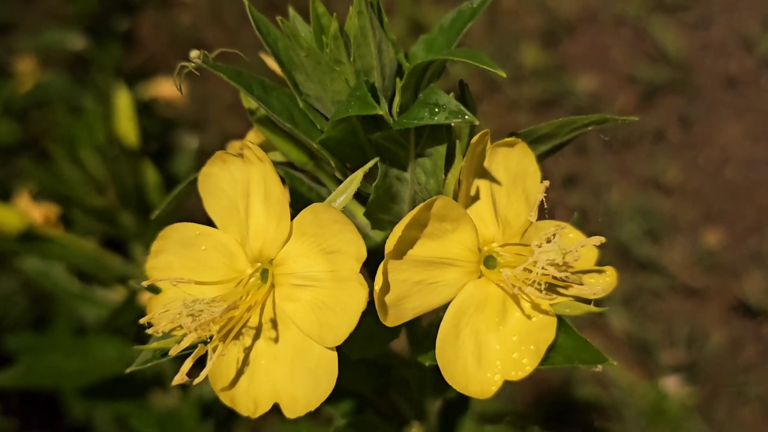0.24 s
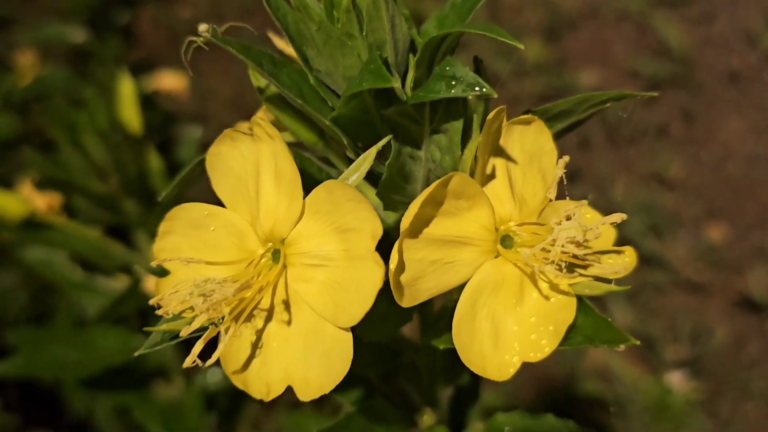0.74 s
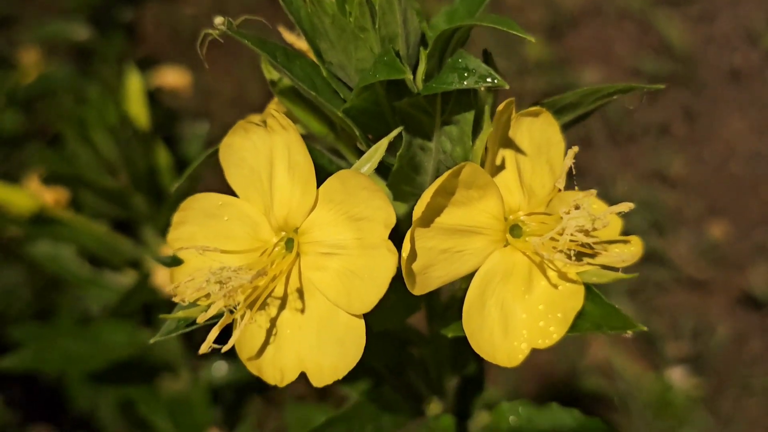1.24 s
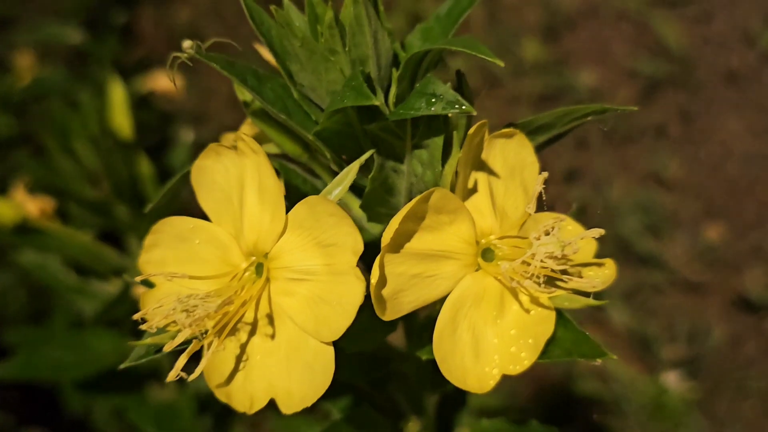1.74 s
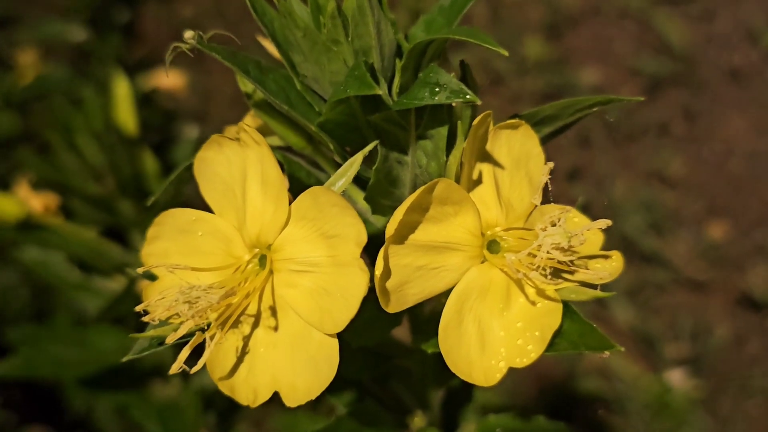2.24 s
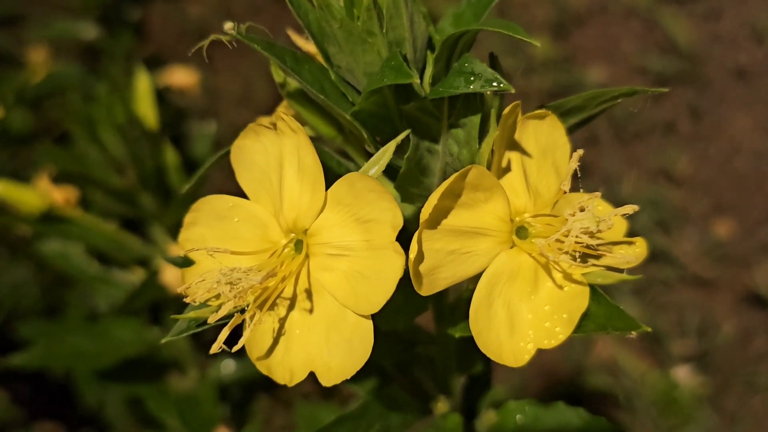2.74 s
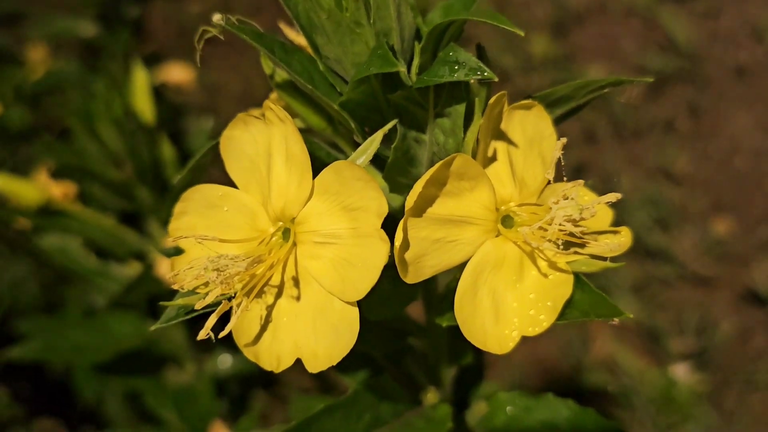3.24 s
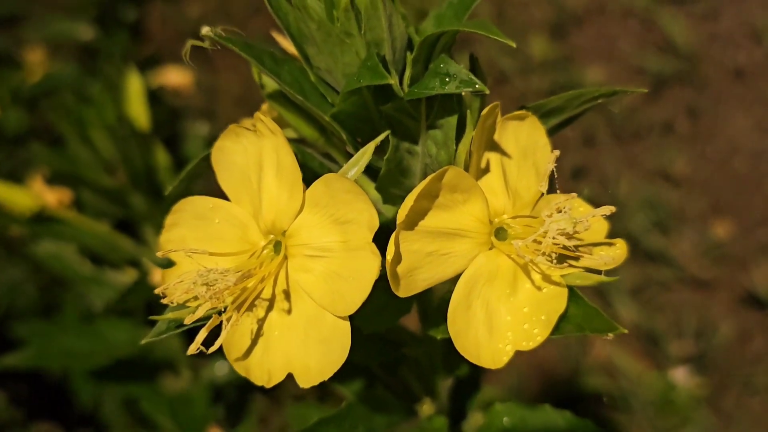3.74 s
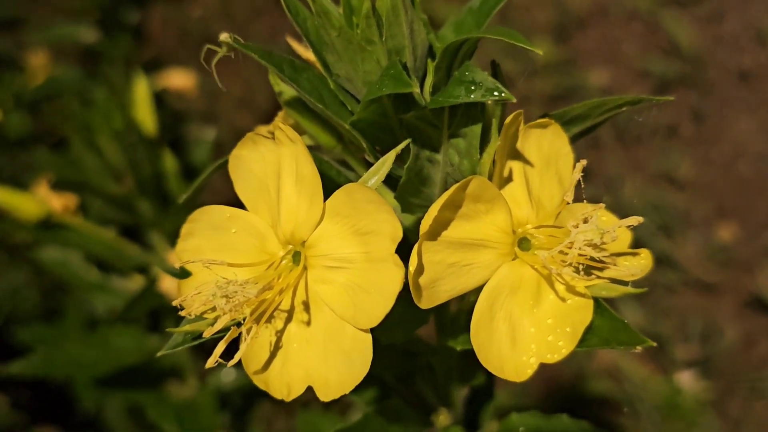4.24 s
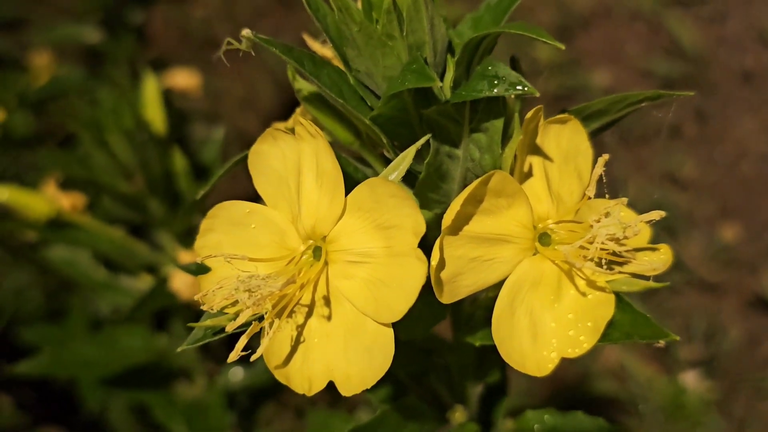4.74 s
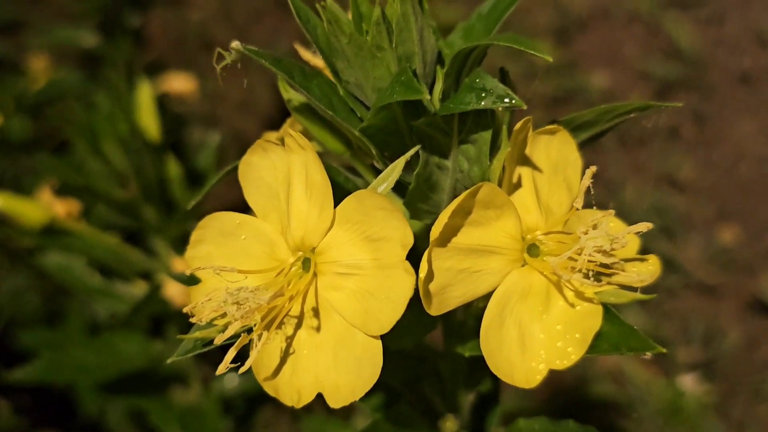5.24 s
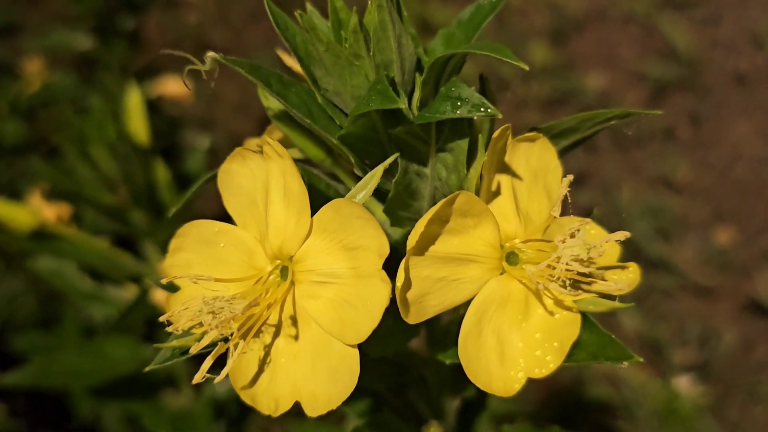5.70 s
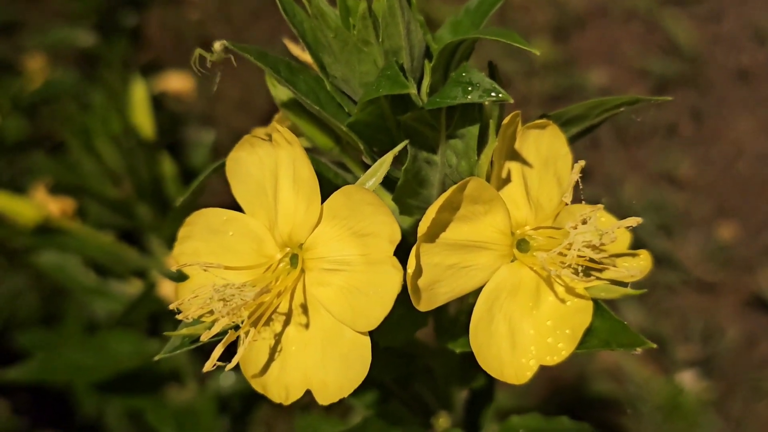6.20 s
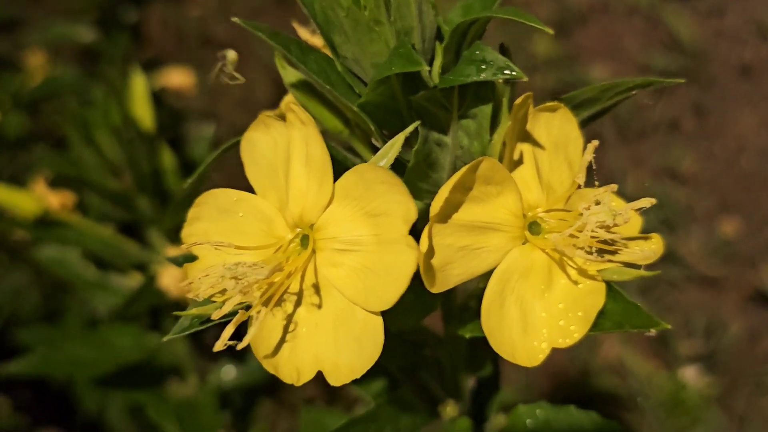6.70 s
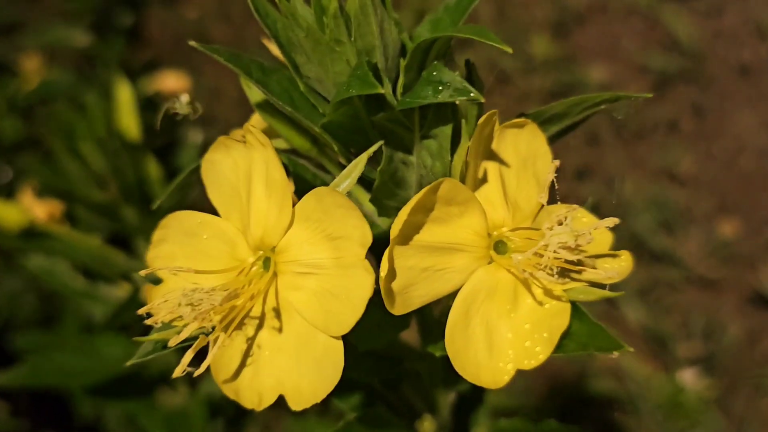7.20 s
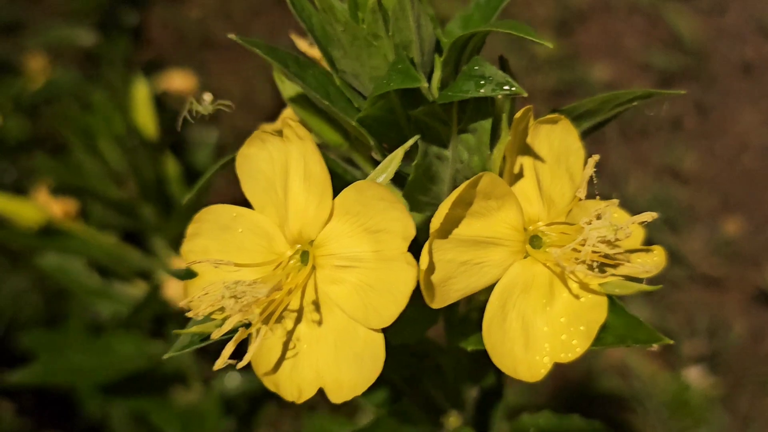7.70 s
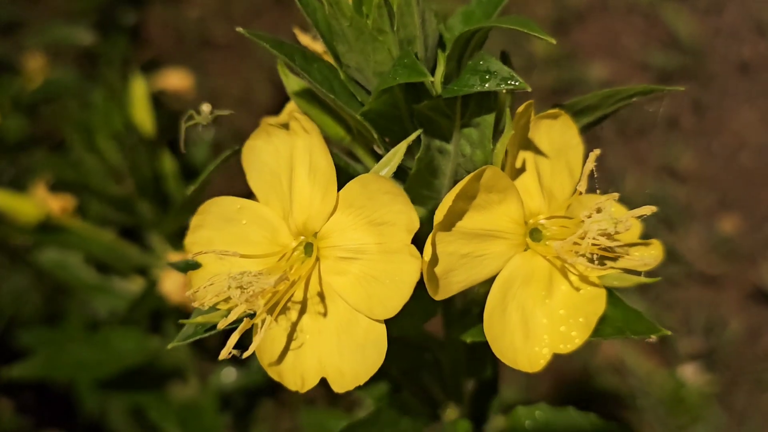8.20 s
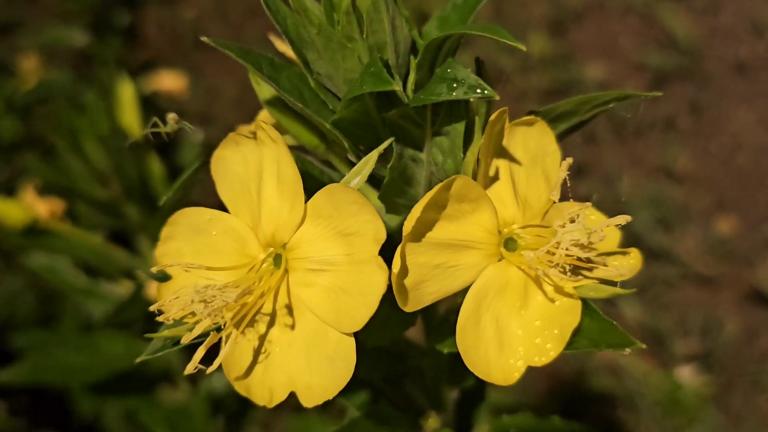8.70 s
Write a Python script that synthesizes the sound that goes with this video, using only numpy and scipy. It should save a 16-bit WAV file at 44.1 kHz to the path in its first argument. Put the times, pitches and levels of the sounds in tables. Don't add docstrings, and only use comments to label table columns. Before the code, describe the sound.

About nine seconds of an open meadow in wide stereo. Deep far road rumble is constant, with soft wind thumps at 0.3 and 1.4 s and stronger ones near 7 and 7.5 s. Tree crickets, around 3 kHz, trill in fluttering phrases of about half a second, swelling with short dips between and quieter after 7 s. A dry stem ticks at 0.2 s. A short bright zip repeats every 0.75 s, left of centre; a faint fast buzz swells and cuts off about every 1.25 s. A near katydid rasps very high on the left until 4 s, then from 5 s, growing strongest around 8.5 s; a farther one scrapes fainter at 0.8-2.6 and 4.3-6.2 s. A single chirp pulse falls at 2.6 s. A faint ground cricket rattles at 5.6-6 s, a closer left one at 7.1-7.9 s. A faint low motor drone enters near 7.9 s and recedes.

```python
import sys
import numpy as np
from scipy import signal
from scipy.fft import rfft, irfft, next_fast_len
from scipy.io import wavfile
from scipy.ndimage import uniform_filter1d, map_coordinates

SR = 44100
rng = np.random.default_rng(int(sys.argv[2]) if len(sys.argv) > 2 else 0)


def how_loud(loudness_db):
    steps = np.asarray(loudness_db, float) / 20
    return 10 ** steps


def to_wav(sig):
    pcm = np.clip(np.atleast_2d(sig), -1, 1) * 32767
    pcm = np.round(pcm).astype(np.int16)
    wavfile.write(sys.argv[1], SR, pcm.T)


N = 394694

# f/Hz, spectral density level/dB
FILE_SPECTRUM = [(5000, -42), (8000, -32), (10500, -22), (11500, -12), (13500, -5), (15000, -2), (16000, 0)]


def in_time(rows):
    s, *columns = np.transpose(rows)
    return [np.interp(np.arange(N) / SR, s, c) for c in columns]


def at_hz(points, hz):
    table_hz, table_db = np.array(points)[:, 0], np.array(points)[:, 1]
    return np.interp(np.log(hz + 1), np.log(table_hz), table_db)


def rms_one(x):
    return x / np.sqrt(np.mean(x ** 2) + 1e-20)


def drift(rate):
    knots = rng.standard_normal(400)
    return map_coordinates(knots, [np.arange(N) * min(rate, 40) / SR], order=3)


def coloured(x, spectrum, lag_ms=0):
    size = next_fast_len(N)
    hz = np.arange(size // 2 + 1) * SR / size
    delay = np.exp(-2j * np.pi * hz * lag_ms / 1000)
    return irfft(rfft(x, size) * how_loud(at_hz(spectrum, hz)) * delay, size)[..., :N]


def ringing(x, hz, width_hz):
    band = [hz - width_hz / 2, hz + width_hz / 2]
    return signal.sosfilt(signal.butter(3, band, "band", fs=SR, output="sos"), x + 1e-18)


def panned(x, pan_db, lead=0):
    right = how_loud(-np.asarray(pan_db)) + 0 * x
    return np.array([x, np.roll(x, lead) * right]) * 2 / (1 + right)


def foliage(x, wet_db, t60):
    t = np.arange(4000) / SR
    scatter = rng.standard_normal((2, 4000)) * how_loud(-60 * t / t60) * (t > .002)
    scatter = scatter / np.sqrt(np.sum(scatter ** 2, axis=1, keepdims=True))
    echoes = signal.fftconvolve(x, scatter, axes=1)[:, :N]
    return (x + how_loud(wet_db) * echoes) / np.sqrt(1 + how_loud(2 * wet_db))


def beats(phrases, uneven_ms, uneven_db):
    rows = []
    for s, so_far, db in map(np.transpose, phrases):
        whole = np.arange(round(so_far[-1]) + 1)
        rows += zip(np.interp(whole, so_far, s), np.interp(whole, so_far, db))
    return rows + rng.standard_normal((len(rows), 2)) * [uneven_ms / 1000, uneven_db]


def wing_pulses(hz, per_s, duty, fall, overtones, lag_ms=0):
    beat = np.cumsum(per_s * (1 + .008 * drift(2.5))) / SR + rng.random()
    strength = how_loud(1.5 * rng.standard_normal(3000))
    slip = np.cumsum(.6 * rng.standard_normal(3000))
    wing_hz = hz * (1 + .0015 * drift(1.5))
    ports = []
    for late_s in (lag_ms / 1000, 0):
        count, part = np.divmod(beat + 1 - late_s * per_s, 1)
        count = count.astype(int)
        closing = np.clip(part / duty, 0, 1)
        sag = 1 + fall * (.5 - closing / 2)
        phase = 2 * np.pi * wing_hz * part / per_s * sag + slip[count]
        tone = np.sin(phase) + sum(how_loud(db) * np.sin(k * phase) for k, db in overtones)
        ports.append(tone * np.sin(np.pi * closing) ** .8 * strength[count])
    return np.array(ports)


def background():
    # f/Hz, spectral density level/dB
    road_spectrum = [(12, -63), (20, -13.5), (41, -3), (64, 1.5), (97, -9.5), (235, -12.5), (266, -16.5),
                     (307, -21), (333, -23.5), (361, -28.5), (711, -33.5), (855, -30.5), (1140, -26.5),
                     (2490, -45), (2700, -51.5), (3510, -48.5), (5940, -120)]
    # f/Hz, spectral density level/dB
    air_spectrum = [(2600, -31), (3400, -3.5), (4700, -4), (5500, -9), (7000, -9.5), (10500, -19.5),
                    (12000, -3), (16000, -4)]
    # f/Hz, likeness/1
    coherence = [(40, .94), (300, .92), (420, .82), (600, .45), (1400, .65), (2000, .25), (4000, .1)]
    shared, left, right = rng.standard_normal((3, N))
    bounded = [(hz, np.clip(c, .01, .99)) for hz, c in coherence]
    alike = [(hz, 10 * np.log10(c)) for hz, c in bounded]
    unlike = [(hz, 10 * np.log10(1 - c)) for hz, c in bounded]
    common = np.array([coloured(shared, alike), coloured(shared, alike, lag_ms=0.41)])
    pair = common + coloured(np.array([left, right]), unlike)
    road = rms_one(coloured(pair, road_spectrum)) * how_loud(-43.5) * panned(how_loud(.4 * drift(1.2)), 1.5)
    air = rms_one(coloured(pair, air_spectrum)) * how_loud(-81.5 + 4.0) * panned(np.ones(N), 6.4)
    return road + air


def wind_and_motor():
    # t/s, level/dB
    gust_curve = [(0.0, -44.5), (0.25, -37.5), (0.45, -47), (1.35, -50), (1.42, -39), (2.22, -51.5),
                  (5.56, -46.5), (6.86, -41.5), (6.98, -32), (7.15, -46.5), (7.53, -33), (7.68, -41),
                  (8.95, -47)]
    # t/s, level/dB
    motor_curve = [
        (7.75, -87),
        (7.9, -51),
        (8.95, -56),
    ]
    rumble_db = -46.5
    gust = np.sqrt(np.maximum(how_loud(2 * in_time(gust_curve)[0]) - how_loud(2 * rumble_db), 0))
    turbulence = [(15, 2), (35, 0.5), (70, 3.5), (130, -7.0), (300, -32.5), (600, -71)]   # f/Hz, level/dB
    lumps = rms_one(coloured(rng.standard_normal((2, N)), turbulence))
    lumps = lumps + 1.2 * lumps[0]
    motor_hz = 165 * (1 + 0.01196 * drift(4.7))
    motor_level = how_loud(in_time(motor_curve)[0] + 3.0 + 1.0 * drift(5.1))
    motor = np.sin(2 * np.pi * np.cumsum(motor_hz) / SR) * motor_level
    return rms_one(lumps) * panned(gust, 1.3) + motor


def phrasing():
    # start t/s, end t/s, level/dB
    phrase_table = [(-.2, 0.327, -56), (0.53, 0.957, -54), (0.99, 1.34, -59), (1.296, 1.668, -55.5),
                    (1.842, 2.266, -54.5), (2.384, 2.94, -57.5), (3.046, 3.563, -56.5), (3.59, 3.9, -57),
                    (3.91, 4.51, -58), (4.55, 5.088, -57.5), (5.252, 5.69, -55.5), (5.935, 6.32, -54),
                    (6.508, 6.964, -55), (7.12, 7.453, -60.5), (7.652, 8.01, -60.5), (8.223, 8.59, -60),
                    (8.763, 9.1, -61.5)]
    between_db, swell_db_per_s = -60.5, -4
    attack_s, release_s = .11, .05
    t = np.arange(N) / SR
    power = how_loud(2 * between_db)
    for start, end, db in phrase_table:
        rise, fall = (t - start) / attack_s, (end - t) / release_s + .5
        shape = np.clip(np.minimum(rise, fall), 0, 1)
        power = power + (shape * how_loud(db - swell_db_per_s * (end - t))) ** 2
    return 10 * np.log10(power)


def tree_crickets():
    # wing f/Hz, pulse rate/Hz, level/dB, lag of the left port/ms
    singer_table = [(2990, 57.0, 0, .035), (2985, 55.6, -6, -.02), (3050, 53.5, -8, .04),
                    (2950, 58.1, -8, -.05), (3000, 51.0, -9, .05), (3110, 56.1, -13, -.02),
                    (2910, 54.4, -13, .03)]
    # multiple of f/1, level/dB
    wing_overtones = [(2, -30), (3, -35.5)]
    level_db = phrasing()
    voices = []
    for hz, per_s, db, lag_ms in singer_table:
        song = wing_pulses(hz, per_s, .66, .05, wing_overtones, lag_ms)
        voices.append(foliage(how_loud(db + 2.5 * drift(1.6)) * song, -10, .1))
    choir = voices[0] * how_loud(.7 * (level_db + 55)) + sum(voices[1:])
    choir = choir / np.sqrt(uniform_filter1d(np.mean(choir, axis=0) ** 2, size=6000))
    return choir * panned(how_loud(level_db), 2.4)


def buzzer():
    # t/s, level/dB
    phrase_ends = [(.18, -76), (1.37, -76), (2.65, -74.5), (3.9, -77), (5.15, -74.5), (6.41, -75),
                   (7.66, -75), (8.92, -74.5)]
    t = np.arange(N) / SR
    left_s, swell = 0, 0
    for end, db in phrase_ends:
        left_s = left_s + (end - t) * (t < end) * (t > end - .75)
    for end, db in phrase_ends:
        swell = swell + how_loud(db - 1.5 - 18.0 * left_s) * (t < end) * (t > end - .75)
    song = rms_one(wing_pulses(6350 - 300 * left_s, 138., .4, .08, [], -.18))
    return foliage(song * panned(swell, 5.0), -2, .1)


def katydid(strokes, tooth_ms, width_ms, back_ms, back_db, fuzz):
    bumps = np.zeros(N + SR)
    s, db = np.transpose(strokes)
    bumps[(s * SR).astype(int)] = how_loud(db)
    bumps[((s + back_ms / 1000) * SR).astype(int)] = how_loud(db + back_db)
    t = np.arange(-900, 901) / SR
    stroke = np.convolve(bumps, np.exp(-.5 * (t * 1000 / width_ms) ** 2), "same")[:N]
    teeth_so_far = np.cumsum(1000 / tooth_ms * (1 + .12 * drift(30.))) / SR
    teeth = np.diff(np.floor(teeth_so_far), prepend=0)
    teeth = rms_one(teeth * how_loud(2.9 * rng.standard_normal(N)))
    rasp = rms_one(coloured(teeth + fuzz * rng.standard_normal(N), FILE_SPECTRUM))
    return rasp * stroke


def katydids():
    # t/s, strokes so far/1, level/dB
    near_strokes = [
        [(.026, 1, -58), (.203, 3, -72)],
        [(.050, -0.5, -55.5), (.664, 10, -65)],
        [(.713, 0, -66), (.831, 4, -59), (1.187, 8, -53.5), (1.998, 20.5, -53), (2.060, 22, -51.5)],
        [(2.095, -0.5, -53), (2.370, 5, -47), (2.779, 12, -53), (3.795, 29, -50), (4.035, 34.5, -60)],
        [(4.945, -0.5, -52.5), (5.140, 3, -52.5), (5.310, 6, -50), (5.498, 9.5, -57), (6.163, 19.5, -52),
         (6.230, 21, -58), (6.436, 23, -60)],
        [(6.540, 0, -52.5), (6.865, 6, -49), (7.388, 15, -47), (8.538, 34, -43.5)],
        [(8.614, 0, -53), (8.909, 5, -53)],
    ]
    # t/s, left-right level/dB
    near_pan = [(0.28, 19), (0.8, 10), (1.28, 11), (1.78, 10), (2.29, 13), (2.75, 7), (3.23, 19), (3.7, 11),
                (4.83, 7), (5.53, 12), (6.06, 15), (6.61, 20), (7.07, 12), (7.54, 6), (8.02, 5.5),
                (8.51, 11), (8.85, 24)]
    # t/s, strokes so far/1, level/dB
    far_strokes = [
        [(.757, -3, -84), (.866, 2, -58), (1.379, 12.5, -68), (1.731, 18, -56), (2.460, 29, -60),
         (2.645, 35, -64)],
        [(4.250, 0.5, -73), (4.415, 4, -53.5), (4.697, 9, -53), (4.997, 15, -57.5), (5.300, 19, -58),
         (6.165, 32.5, -53.5)],
        [(8.574, -8, -67), (8.938, 8, -68)],
    ]
    # t/s, level/dB, left-right level/dB
    hiss_curve = [(0, -75, 10), (.6, -91, 9), (.9, -76, -8), (2.4, -73, 17), (2.9, -80, 8), (4.0, -75, 5),
                  (4.1, -85, 4), (4.2, -91, -6), (4.4, -72, -1), (6.1, -64, -1), (6.25, -84, 8),
                  (6.45, -88, 8), (6.7, -71, 4), (7.5, -66, 6), (8.5, -62, 4), (8.95, -70, 5)]
    near = katydid(beats(near_strokes, 1.2, 1.3), tooth_ms=3.1, width_ms=4.5, back_ms=27., back_db=-10, fuzz=.9)
    near = panned(near, in_time(near_pan)[0], lead=20)
    far = katydid(beats(far_strokes, 2., 2.), tooth_ms=2.6, width_ms=4.5, back_ms=25., back_db=-8, fuzz=.6)
    far = panned(far, -2.5, lead=-13)
    hiss_db, pan_db = in_time(hiss_curve)
    hiss = rms_one(coloured(rng.standard_normal((2, N)), FILE_SPECTRUM))
    hiss = hiss * panned(how_loud(hiss_db + 2 * drift(30.)), pan_db)
    return foliage(near * how_loud(-1.5), -12, .03) + foliage(far, -5, .04) + hiss


def zipper():
    # t/s, peak level/dB
    zip_times = [(.078, -56.5), (0.8, -59), (1.506, -56.5), (2.276, -56.5), (3.027, -56.5), (3.787, -57.5),
                 (4.529, -55), (5.257, -56), (6.009, -56.5), (6.829, -56), (7.607, -58), (8.328, -58.5)]
    # f/Hz, width/Hz, level/dB, teeth to full strength/1
    wing_modes = [(8850, 700, 0, 2.5), (9750, 900, -2, 7.0), (11400, 1000, -2, 8.0)]
    out, teeth = np.zeros(N), np.arange(24)
    for s, db in zip_times:
        spacing = SR / (341 + 1.2 * rng.standard_normal())
        comb = np.sinc(np.arange(5000)[:, None] - 20 - teeth * spacing)
        run = np.zeros(5000)
        for k, (hz, width_hz, mode_db, wake) in enumerate(wing_modes):
            tooth_db = mode_db - 14 * np.exp(-teeth / wake) + rng.standard_normal(24)
            run += (-1) ** k * ringing(comb @ how_loud(tooth_db), hz, width_hz)
        at = round(s * SR)
        out[at:at + 5000] += how_loud(db + 31.5) * run
    return foliage(panned(out, 6.0, lead=13), -4, .06)


def stem():
    # t/s, peak level/dB
    tick_time = [
        (0.238, -51),
    ]
    s, db = tick_time[0]
    click = np.zeros(N)
    click[round(s * SR) + 20] = how_loud(db + 17.0)
    return panned(signal.sosfilt(signal.butter(2, [4800, 6800], "band", fs=SR, output="sos"), click), 10.0)


def rattle(pulses, hz, first_bend, ring_db, snap_db):
    # f/Hz, width/Hz, level/dB
    ring_modes = [(8560, 195, -2), (8100, 420, -10), (8870, 1040, -12)]
    # f/Hz, spectral density level/dB
    snap_spectrum = [(3300, -61), (4000, 2.5), (4900, -3), (5500, -7), (6200, -6.5), (7400, -5.5),
                     (9500, 2), (11000, -17)]
    wing, clicks, t = np.zeros(N), np.zeros(N), np.arange(900) / SR
    for k, (s, db) in enumerate(pulses):
        at = round((s - .001) * SR)
        wing_hz = hz * (1 + first_bend * np.exp(-k / 4.0) + .005 * rng.standard_normal())
        envelope = np.sin(np.pi * np.clip(t / 0.0041, 0, 1))
        wing[at:at + 900] += how_loud(db) * envelope * np.sin(2 * np.pi * wing_hz * t * (1 - 3.2 * t))
        clicks[at] = how_loud(db + 2 * rng.standard_normal())
    shake = signal.fftconvolve(clicks, t * 900 * np.exp(-t / 0.0036))[:N]
    ring = np.zeros(N)
    for mode_hz, width_hz, db in ring_modes:
        rough = shake * rng.standard_normal(N)
        ring += how_loud(db + ring_db) * ringing(rough, mode_hz * hz / 4420, width_hz)
    return wing + ring + how_loud(snap_db) * coloured(shake * rng.standard_normal(N), snap_spectrum)


def ground_crickets():
    # t/s, peak level/dB
    lone_pulse = [
        (2.6419, -48),
    ]
    # t/s, pulses so far/1, peak level/dB
    far_pulses = [
        (5.6037, -1, -72),
        (5.6917, 4, -61.5),
        (5.8463, 11, -57.5),
        (6.0294, 19.5, -59.5),
    ]
    # t/s, pulses so far/1, peak level/dB
    near_pulses = [
        (7.0750, 1, -68),
        (7.0983, 1, -53),
        (7.239, 7, -51),
        (7.5139, 19, -52.5),
        (7.7493, 29, -50.5),
        (7.8516, 34, -55.5),
        (7.8780, 35.5, -69),
    ]
    near = rattle(beats([near_pulses], .3, 1.8), 4520, -.06, ring_db=7, snap_db=-4)
    near = near + rattle(lone_pulse, 4500, -.025, ring_db=9, snap_db=-4)
    far = rattle(beats([far_pulses], .4, 1.6), 5300, -.005, ring_db=-8, snap_db=-15)
    far = panned(far, 3.9, lead=10)
    return foliage(panned(near, 12., lead=21), -14, .08) + foliage(far, -7, .08)


def scene():
    insects = tree_crickets() + buzzer() + katydids() + zipper() + ground_crickets()
    return background() + wind_and_motor() + insects + stem()


def low_pass(x):
    return signal.sosfilt(signal.butter(12, 16640, fs=SR, output="sos"), x)


def record(dry):
    cut = signal.sosfilt(signal.ellip(12, .5, 70, 15800, fs=SR, output="sos"), dry)
    return low_pass(cut)


dry = scene()
out = record(dry)
to_wav(out)
```